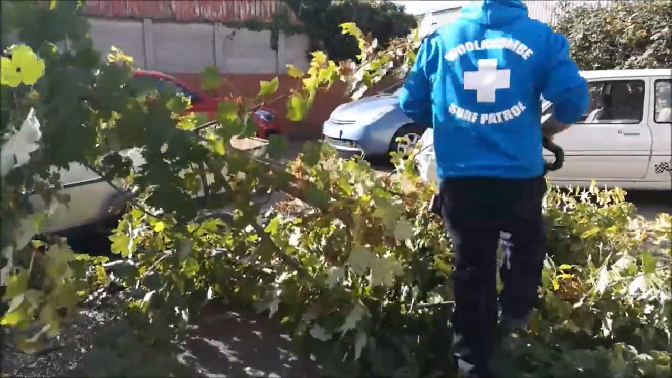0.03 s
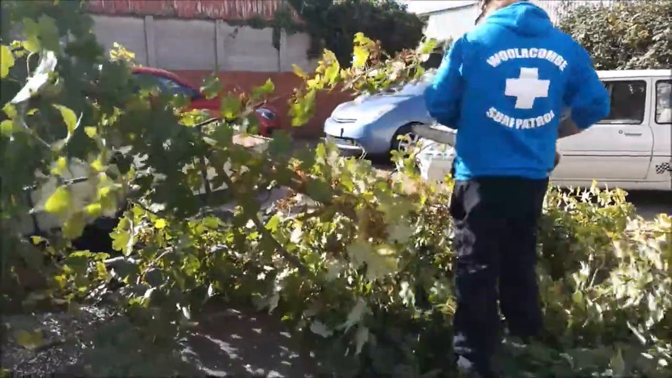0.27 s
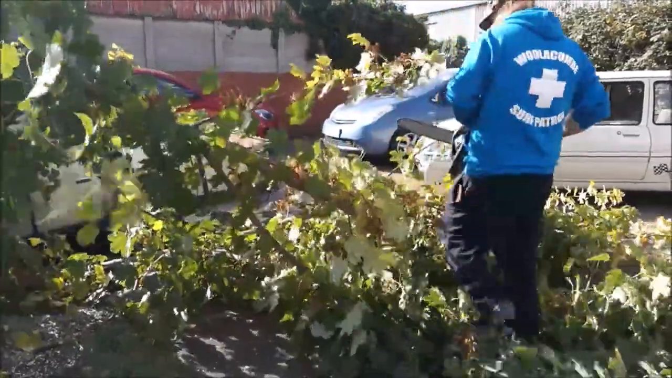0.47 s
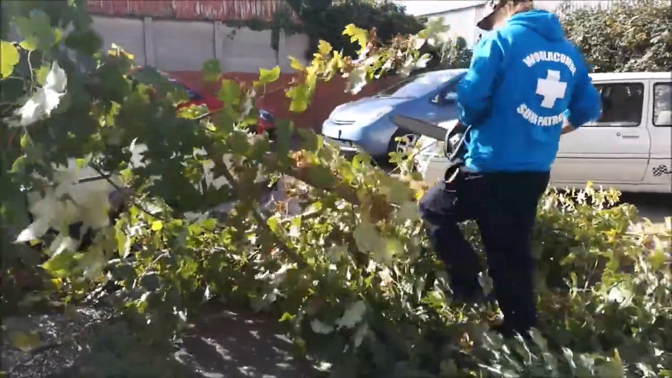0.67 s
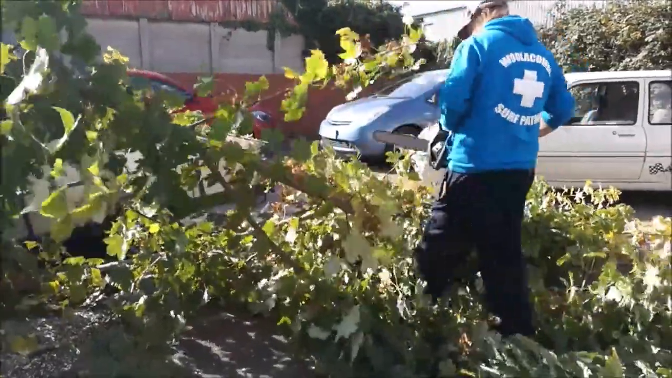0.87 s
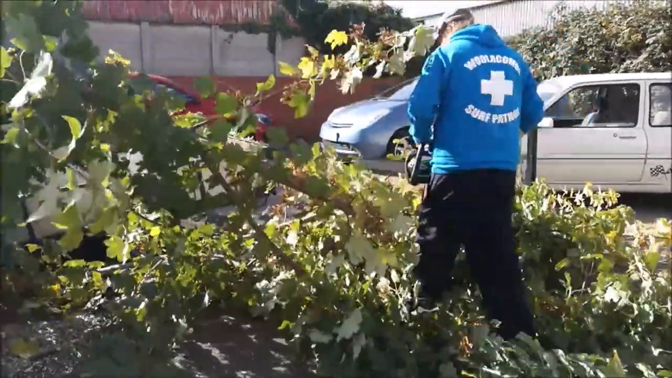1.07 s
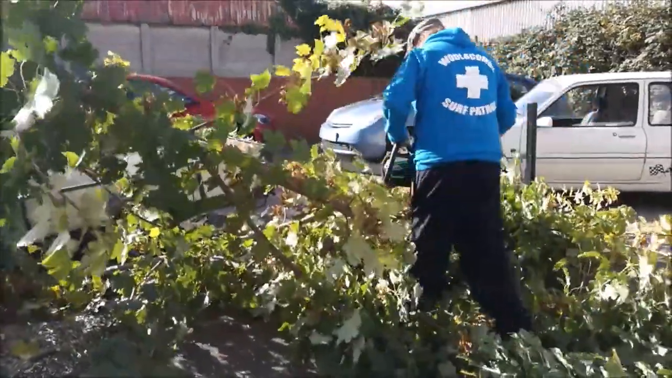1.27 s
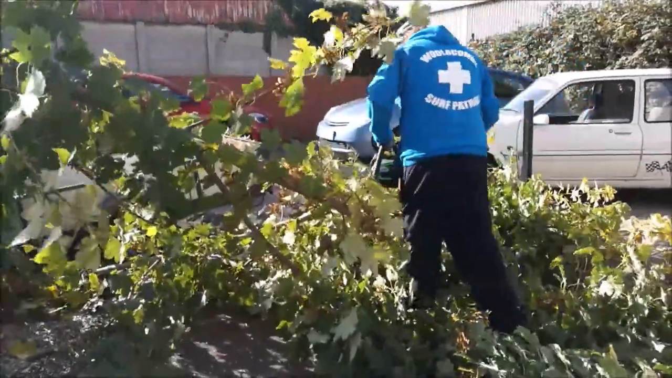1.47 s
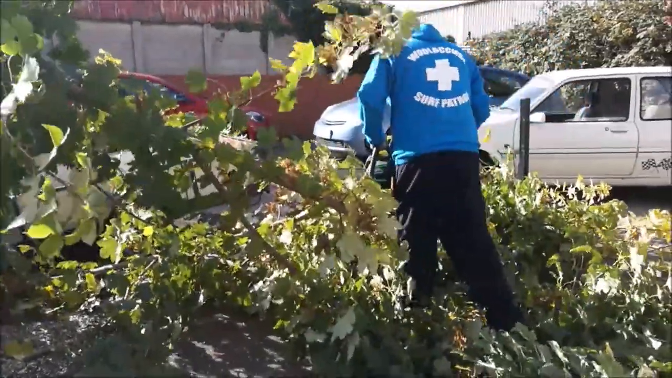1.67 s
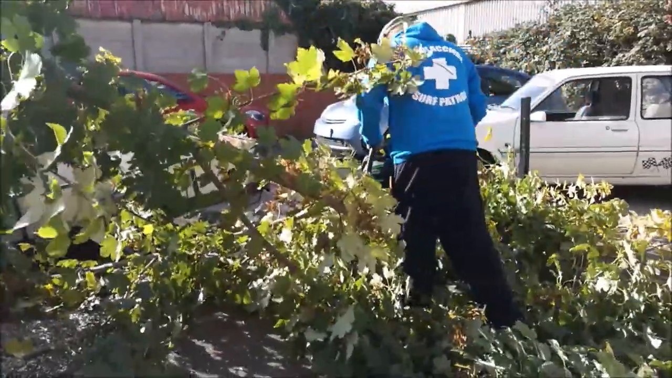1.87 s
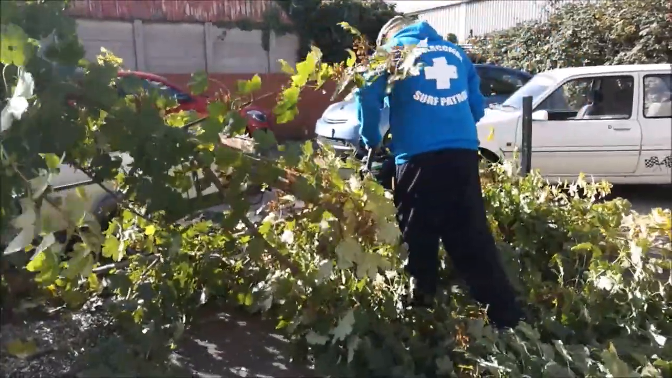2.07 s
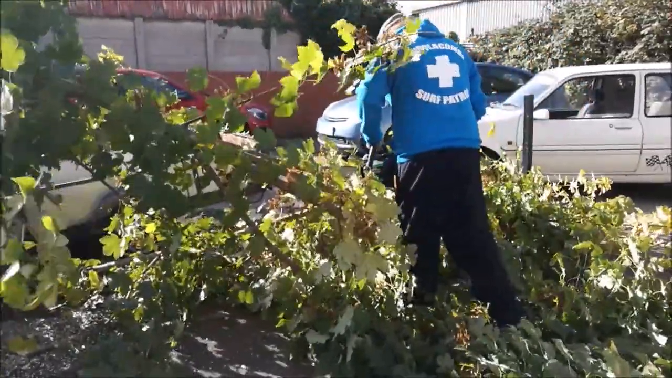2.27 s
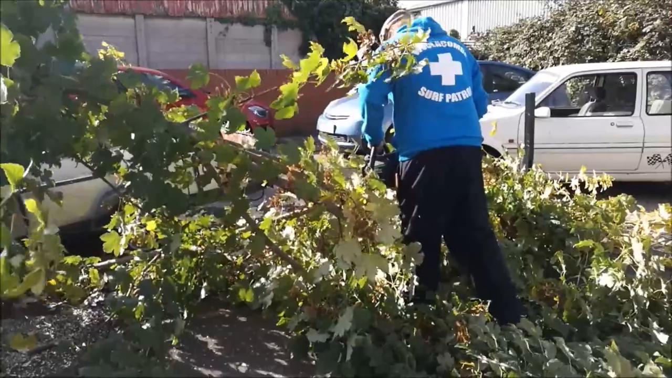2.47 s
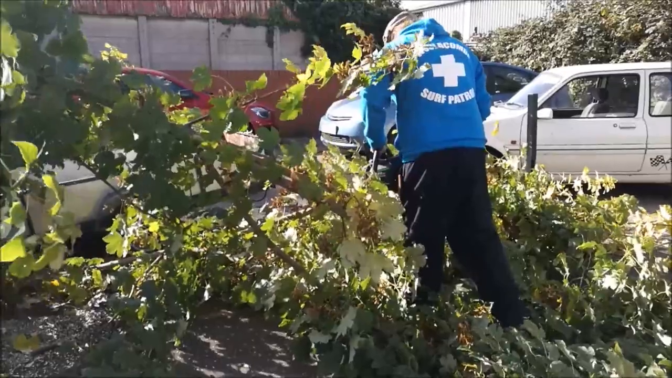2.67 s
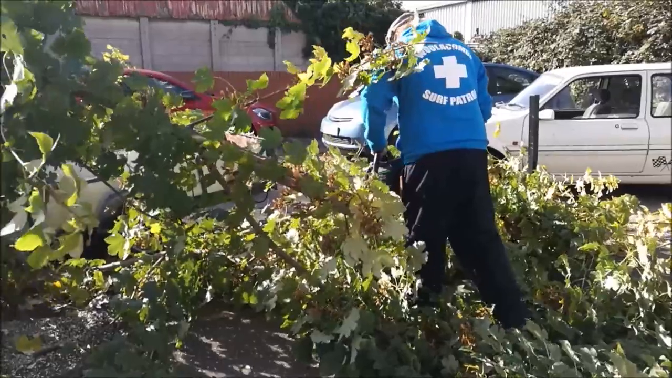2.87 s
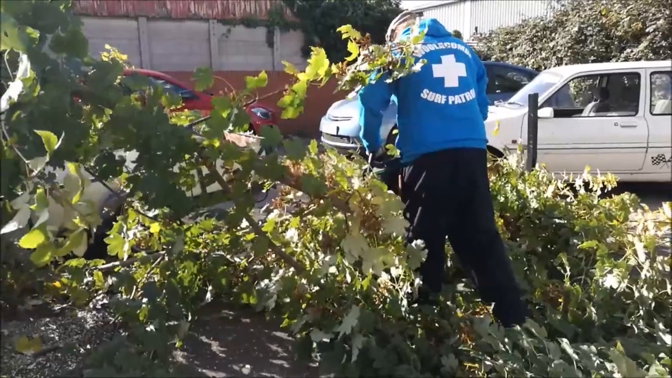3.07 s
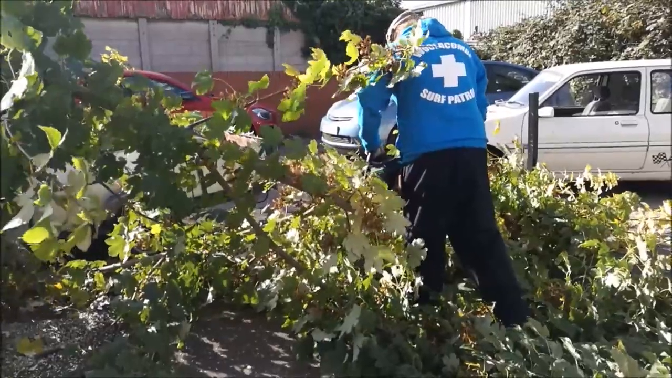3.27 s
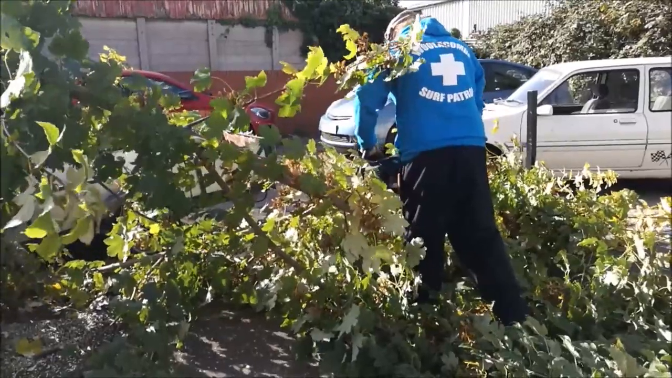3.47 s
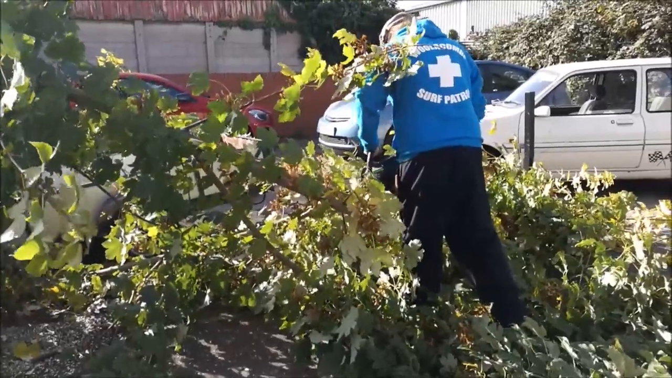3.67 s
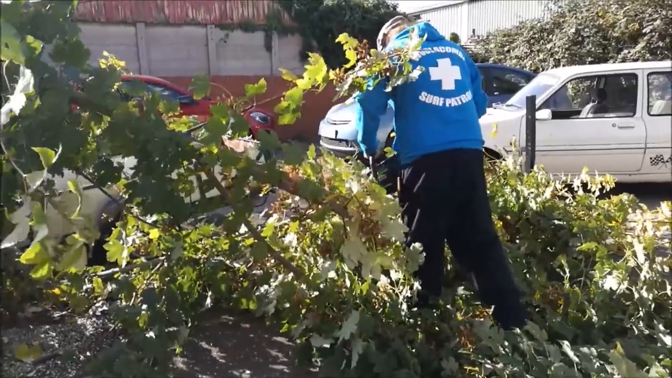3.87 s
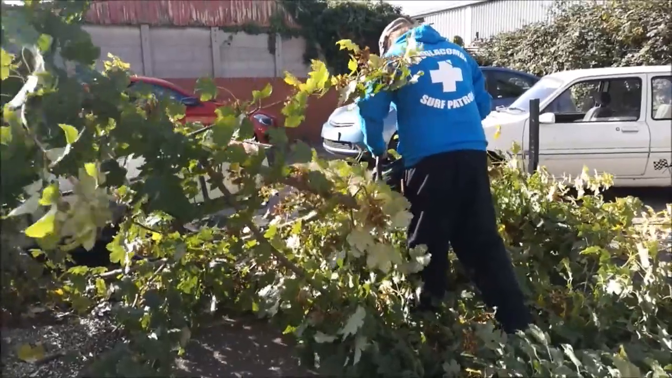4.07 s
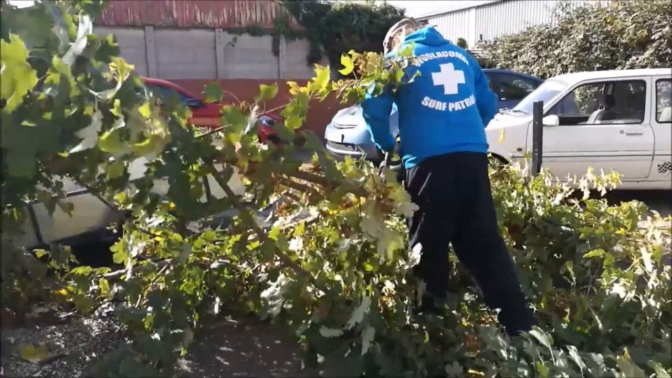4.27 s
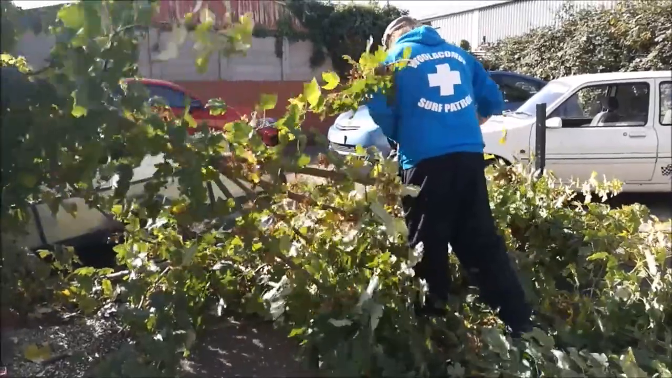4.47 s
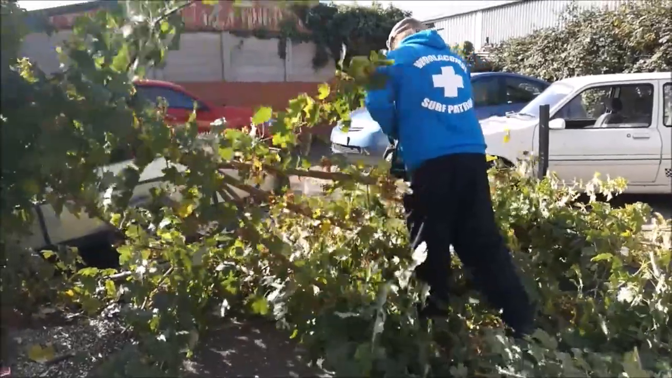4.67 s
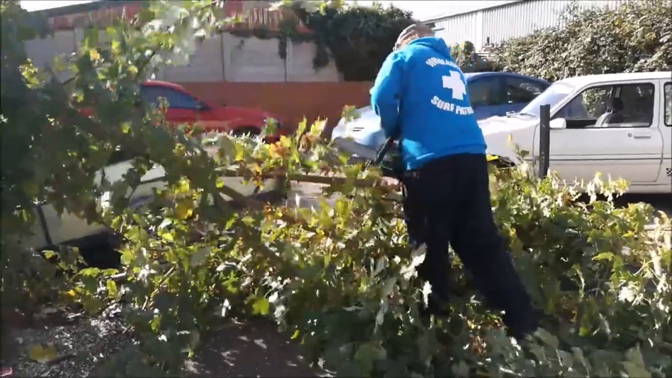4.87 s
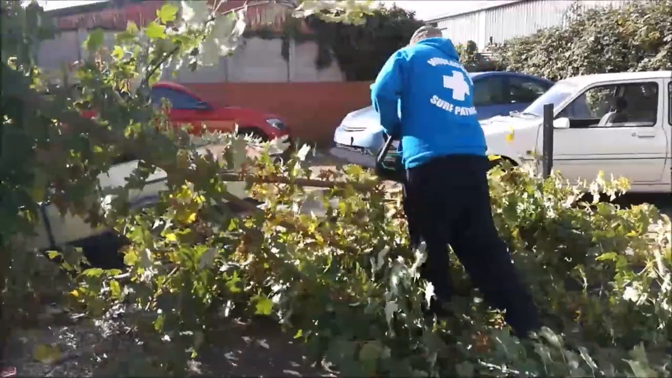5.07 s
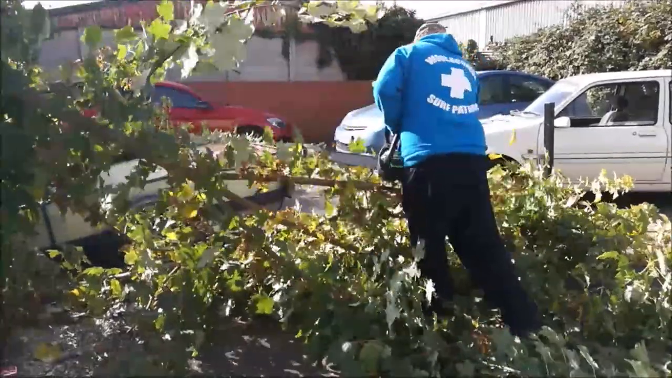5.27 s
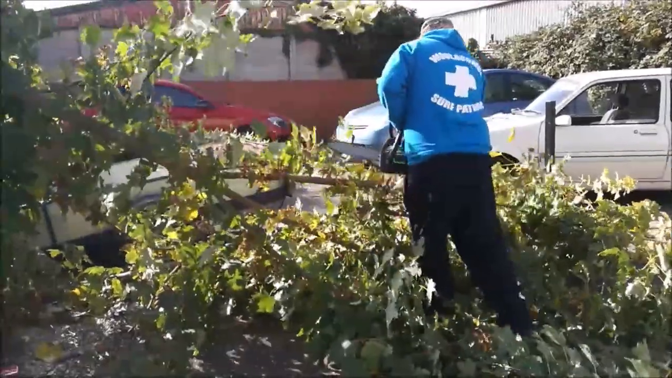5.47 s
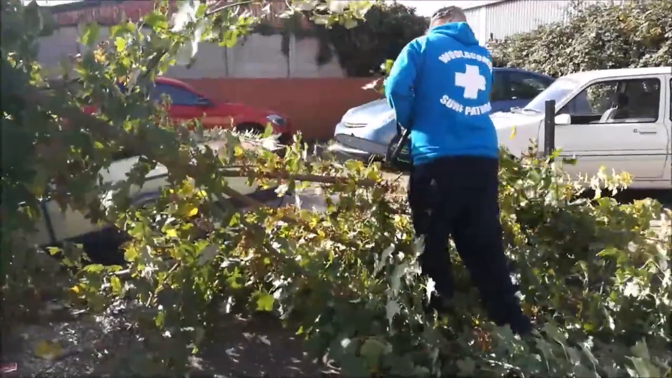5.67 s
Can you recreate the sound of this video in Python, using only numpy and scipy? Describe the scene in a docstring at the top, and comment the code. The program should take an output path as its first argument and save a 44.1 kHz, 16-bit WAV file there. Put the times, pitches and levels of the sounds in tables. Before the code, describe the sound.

In a yard with a low, steady engine hum in the distance, someone steps into leafy branches, cracking twigs. An electric chainsaw climbs to a high whine with a rattling, hissing chain, sagging in pitch as it cuts wood. After under three seconds of running it brakes, squeaking faintly, leaving quieter rustling and small snaps as the branch is pulled away. The saw stands out clearly in the stereo sound.

```python
"""A battery chainsaw in a yard, heard through two small microphone ports. First a step thuds, leaves rustle
and twigs snap as the saw is carried into a fallen tree. The motor winds up: links striking the sprocket
make a rising whine while the chain rattles and hisses. The cutters bite a branch and the load pulls the
pitch down. The brake stops the chain, which squeaks to rest, and the cut bough is dragged away through
the leaves. A distant engine hums throughout."""
import sys
import numpy as np
from scipy import signal
from scipy.fft import rfft, irfft
from scipy.io import wavfile

SR = 44100
rng = np.random.default_rng(int(sys.argv[2]) if len(sys.argv) > 2 else 0)


def inscribe(sig):
    """Save sig as 16-bit PCM at rate SR to the path in sys.argv[1].

    A 1-D sig is mono; a 2-D sig holds one channel per row.
    Samples are clipped to [-1, 1] before scaling.
    """
    pcm = np.round(np.clip(np.atleast_2d(sig).T, -1, 1) * 32767)
    wavfile.write(sys.argv[1], SR, pcm.astype(np.int16))


N = 253134
T = np.arange(N) / SR
HZ = np.fft.rfftfreq(N, 1 / SR)
TEETH, LINKS_PER_PAIR = 6, 4  # links per sprocket turn, and per pair of cutters


# The trigger is squeezed slowly, held, then let go: (time [s], unloaded link rate [1/s])
THROTTLE = [(1.305, 88), (1.75, 282), (2.02, 381), (2.13, 444), (2.39, 560), (2.57, 601), (3.2, 603),
            (3.62, 614), (3.955, 610)]
def saw(jitter=0.0012, engage_s=0.018, brake_s=0.072, full_load_sag=19.5):
    """Rotating machinery: one shaft, set by trigger, load and brake, times the whine, buzz and chain."""
    sag, chips_db = cutting()
    rattle_db, whine_db, ring_db = surges()
    engaged = 1 - np.exp(-since(THROTTLE[0][0]) / engage_s)
    braked = np.exp(-(since(THROTTLE[-1][0]) / brake_s) ** 1.5)
    free_rate = curve(THROTTLE) * engaged * braked
    speed = free_rate / free_rate.max()
    load = np.minimum(sag / full_load_sag, 1)
    shaft_hz = (free_rate - sag * speed) / TEETH * (1 + jitter * wander(13.7))
    turns = np.cumsum(shaft_hz) / SR
    tones = whine(shaft_hz, turns, speed, load, whine_db) + buzz(turns, speed, load)
    return tones + chain(turns, speed, rattle_db, ring_db, chips_db) + high_tones()


# Bites into the wood: (start [s], deepest [s], sag in link rate [1/s], added hiss [dB])
CUTS = [(2.85, 3.451, 42, 6), (3.627, 3.709, 38, 0), (3.848, 3.923, 13.6, 2)]
def cutting(break_free_s=0.1, inertia_s=0.03):
    """Load and inertia: a deepening cut throws more chips and slows the chain with a first-order lag."""
    drag, chips_db = np.zeros(N), np.zeros(N)
    for start, deepest, sag, db in CUTS:
        depth = np.interp(T, [start, deepest, deepest + break_free_s], [0, 1, 0])
        drag += sag * depth ** 2
        chips_db += db * np.sin(np.pi / 2 * depth) ** 2  # levels off once the cutters are full
    keep = np.exp(-1 / (inertia_s * SR))
    return signal.lfilter([1 - keep], [1, -keep], drag), chips_db


# Brief surges: chain slaps during wind-up, then a swell of the whine at full speed:
# (centre [s], length [s], rattle change [dB], whine change [dB], bar ring change [dB])
SURGES = [(1.715, 0.11, 2.5, 2.5, 3.5), (1.898, 0.16, 2.5, 6.5, 5), (2.045, 0.083, 4.5, 3.5, 6),
          (2.846, 0.059, -1, 1.5, -7), (3.118, 0.42, -1.5, 3, -6)]
def surges():
    """Amplitude modulation: rattle, whine and bar ring each change level along a brief bell curve."""
    return sum(np.outer(changes, np.exp(-(2 * (T - s) / length) ** 2)) for s, length, *changes in SURGES)


# Link-rate harmonics and sidebands of the uneven sprocket, then tones of the cutters in the wood:
# (frequency / shaft rate [1], relative level [dB], left minus right [dB])
LINK_ORDERS = [(6, -41.5, 9.5), (7.02, -57, 11), (8.1, -61, 18), (8.94, -60, 13), (10.4, -61, 11),
               (11, -57.5, 23), (11.99, -39, 4.5), (12.99, -47, -11), (13.8, -59.5, 21),
               (17.024, -49.5, -14.5), (18.02, -41.5, -14.5), (19, -51, 19), (20.5, -47, -2),
               (23.5, -60, 17), (24.03, -42.5, 12.5), (25.8, -54, 20), (31.1, -43.5, 6)]
CUTTER_ORDERS = [(20.94, -37, -5), (24.1, -48, 13), (25.5, -39, 5.5), (35.9, -40, 2), (41.9, -51, 4)]
def whine(shaft_hz, turns, speed, load, surge_db, loaded_db=-3.5):
    """Periodic impacts give a line spectrum: sidebands grow with speed, cutter tones with load."""
    flutter = 0.12 + 0.49 * (1 - speed)  # a slow chain hangs loose and strikes unevenly
    links = np.zeros((2, N))
    for row in LINK_ORDERS:
        is_sideband = round(row[0]) % TEETH != 0
        whip = speed ** 0.8 if is_sideband else 1
        damping = amp(loaded_db * load * TEETH / row[0])  # load damps the lowest tones most
        links += partial(row, shaft_hz, turns, flutter) * damping * whip
    cutters = sum(partial(row, shaft_hz, turns, flutter) for row in CUTTER_ORDERS)
    taut, loose = amp(-0.5) * speed ** 5.2, amp(-9) * speed ** 2  # tones ring out only near full speed
    return np.hypot(taut, loose) * (links * amp(surge_db) + cutters * load)


# Modes of the housing: (frequency [Hz], bandwidth [Hz], gain [dB])
HOUSING_MODES = [(671, 190, 0), (1147, 61, 0), (1697, 142, 8.5)]
def partial(row, shaft_hz, turns, flutter, port_delay_s=0.0002, drift_db=0.82):
    """Forced resonance: a shaft order swells as it sweeps through a mode of the housing."""
    order, db, side_db = row
    hz = order * shaft_hz
    body = 1 + peaks(HOUSING_MODES, hz)
    body /= 1 + np.exp((420 - hz) / 40)  # the small shell radiates little bass
    unrest = np.sqrt(order / TEETH)  # chain slap roughens the higher orders most
    shake = flutter * unrest
    level = np.sqrt(2) * amp(db + drift_db * unrest * wander(5.6)) * body * (1 + shake * wander(26))
    phase = 2 * np.pi * order * turns + 0.45 * shake * wander(37.2)
    return level * pan(side_db) * np.cos([phase, phase - 2 * np.pi * hz * port_delay_s])


def buzz(turns, speed, load, centre_hz=3400, width_octaves=2.2, bite_db=4):
    """Harmonic series of the passing cutter pairs: a dense, uneven comb that swells in the cut."""
    pair_turns, pair_hz = turns * TEETH / LINKS_PER_PAIR, THROTTLE[-1][1] / LINKS_PER_PAIR
    out = np.zeros((2, N))
    for k in range(14, 62):
        db = 3 * rng.standard_normal((2, 1)) - 10 * (np.log2(k * pair_hz / centre_hz) / width_octaves) ** 2
        phase = 2 * np.pi * (k * pair_turns + rng.random((2, 1)))
        out += amp(db) * pan(spectrum(PORT_BALANCE, k * pair_hz)) * np.cos(phase)
    return np.sqrt(2) * out * speed ** 2.7 * amp(-59 + bite_db * load)


# Chain rattle, and hiss of teeth and chips: (frequency [Hz], relative spectral density [dB])
RATTLE_SPECTRUM = [(90, -45), (220, -12.5), (400, -17), (550, -10.5), (800, -6.5), (1100, 3.5), (1450, -2),
                   (1700, 5.5), (2200, 0), (2800, -1.5), (4000, -4.5), (7000, -24), (16000, -6)]
HISS_SPECTRUM = [(150, -45), (500, -42), (2000, -2), (3900, 2), (5000, -1), (7000, -2), (8500, -3),
                 (10000, -1), (11000, 0), (12500, -5), (16000, -13)]
# Modes of the guide bar: (frequency [Hz], bandwidth [Hz], gain [dB])
BAR_MODES = [(767, 300, -7), (1210, 160, -3.5), (1643, 114, -2.5), (2824, 154, -1)]
# Added port bias of rattle and bar: (frequency [Hz], left minus right [dB])
SAW_BALANCE = [(350, -9), (600, 19.5), (850, 13.5), (1200, -0.5)]
# Reflections of the hiss from ground and trunk: (delay [s], gain [1])
REFLECTIONS = [(.0031, 0.31), (.0074, .27)]
def chain(turns, speed, rattle_db, ring_db, chips_db, sink_s=2.02):
    """Random impacts give noise: the bar rings, while rattle and hiss pulse with links and cutters."""
    link_phase = 2 * np.pi * TEETH * turns
    pulse = (1 + 0.074 * np.cos(link_phase)) * (1 + 0.07 * np.cos(link_phase / LINKS_PER_PAIR))
    side_db = spectrum(SAW_BALANCE)
    comb = 1 + sum(gain * np.exp(-2j * np.pi * HZ * delay) for delay, gain in REFLECTIONS)
    knocks = crackle(900, 2.3, 0.0027, 1.9) * pulse * amp(0.44 * wander(26.9))
    rattle = ports(knocks, amp(spectrum(RATTLE_SPECTRUM)), side_db)
    chips = crackle(1500, 2.0, 0.0018, 5.9) * pulse * amp(0.46 * wander(21.85))
    hiss = ports(chips, amp(spectrum(HISS_SPECTRUM)) * comb)
    ring = ports(crackle(180, 1.4, 0.0058, 0.9), peaks(BAR_MODES), side_db)
    sunk_s = since(sink_s)  # all three fade as the bar sinks in among the branches
    rattle *= amp(-32 - 0.4 * sunk_s + rattle_db) * speed ** 1.4
    hiss *= amp(-28.5 - 2.06 * sunk_s + chips_db) * speed ** 1.79
    driven = amp(-39 - 5 * sunk_s + ring_db) * speed
    braked_s = since(THROTTLE[-1][0])
    free_decay = amp(-51.5 - 46 * braked_s) * (braked_s > 0)  # the bar rings on after the brake catches
    return rattle + hiss + ring * np.hypot(driven, free_decay)


# Brief high tones: overtones of the whine ringing out in the cuts, and chain squeaks:
# (centre [s], length [s], frequency [Hz], level [dB])
HIGH_TONES = [(2.61, 0.12, 5550, -41), (3.388, 0.07, 3480, -39), (3.9, .07, 2320, -31),
              (4.007, 0.14, 7450, -58), (4.083, 0.13, 2830, -60), (4.268, 0.19, 2770, -61),
              (4.5, 0.11, 2640, -61)]
def high_tones(waver_hz=45, fall_per_s=0.156):
    """Random modulation of pitch and level roughens brief tones, each sinking a little in pitch."""
    waver = np.cumsum(waver_hz * wander(244.6)) / SR
    roughness = unit_rms(1 + 0.52 * wander(60))
    out = np.zeros(N)
    for s, length, hz, db in HIGH_TONES:
        swell = amp(db) * np.exp(-(2 * (T - s) / length) ** 4)
        cycles = hz * (T - fall_per_s * (T - s) ** 2 / 2) + waver
        out += swell * roughness * np.sin(2 * np.pi * cycles)
    return out


# Leaf noise: (frequency [Hz], relative spectral density [dB])
LEAF_SPECTRUM = [(200, 0), (700, -1), (1500, 0), (2800, 5), (4000, 4), (6000, 0), (8000, -2.5), (10000, 1),
                 (11000, 2), (12500, -3.5), (16000, -8)]
# Branches brushed on the way in, later dragged away: (time [s], hold [s], relative level [dB])
RUSTLES = [(0.044, 1.17, -61.5), (0.128, 0.078, -44.5), (0.224, 0.18, -46.5), (0.733, 0.093, -55.5),
           (0.965, .01, -54.5), (1.072, 0.062, -55), (4.082, 1.246, -56), (4.418, .015, -54),
           (4.6, 0.27, -55), (5.0, .03, -57), (5.23, .01, -53), (5.452, .11, -52.5), (5.638, 0.076, -50)]
def leaves(rise_s=0.03, gain_db=2):
    """Incoherent sources add in power: each push sets leaves brushing in clumps of tiny ticks."""
    power = np.zeros(N)
    for s, hold, db in RUSTLES:
        fall_s = 0.016 + 0.46 * min(hold, 0.25)  # a longer push leaves them swinging longer
        swell = np.exp(-np.maximum(s - T, 0) / rise_s - since(s + hold) / fall_s)
        power += (amp(db + gain_db) * swell) ** 2
    return np.sqrt(power) * ports(crackle(450, 2.0, 0.0058, 1.0), amp(spectrum(LEAF_SPECTRUM)))


# Snapping twigs: (time [s], relative level [dB], 60 dB decay time [s], wood relative to crack [dB])
SNAPS = [(0.679, -36, 0.047, -22), (.716, -44.5, 0.13, -1), (0.8, -33, 0.046, -16), (0.962, -40, .1, -20),
         (1.071, -34, 0.059, -24), (1.146, -36, 0.08, -24), (1.321, -41, 0.065, -0.5),
         (1.66, -28, 0.094, -20), (1.747, -17, 0.07, -27), (4.411, -39, 0.17, -2), (4.698, -44, .08, -0.5),
         (4.889, -37, 0.054, -12), (5.23, -40, 0.045, -13), (5.634, -46.5, .15, 6.5)]
# Modes of a twig: (frequency [Hz], bandwidth [Hz], gain [dB])
TWIG_MODES = [(1640, 800, -3), (2800, 990, 12)]
def twigs(rise_s=0.0012, crisp_hz=3500, gain_db=-7):
    """Impulsive excitation: a fracture gives a bright crack and a woody ring, decaying exponentially."""
    crisp = amp(spectrum(LEAF_SPECTRUM)) * HZ / (HZ + crisp_hz)
    crack = ports(crackle(1200, 0.98, 0.00055, 0.73), crisp)
    wood = ports(noise(), peaks(TWIG_MODES))
    out = np.zeros((2, N))
    for s, db, t60, wood_db in SNAPS:
        envelope = amp(db + gain_db - 60 * since(s) / t60) * (1 - np.exp(-since(s) / rise_s))
        out += envelope * (crack + amp(wood_db) * wood)
    return out


def footstep(at_s=0.096, db=-51, t60_s=1, hz=286, width_hz=260):
    """Damped impact: a heavy step on soil gives a dull puff of low noise."""
    puff = ports(noise(), peaks([(hz, width_hz, 0)]) ** 2)
    return puff * amp(db - 60 * since(at_s) / t60_s) * (T >= at_s)


# Distant engine: (time [s], firing rate [Hz], gain [dB], overtone gain [dB])
HUM = [(0, 78.1, 0, -18), (.55, 79.15, 1, 4), (1.2, 78.84, 2.5, -2.5), (2.4, 78.64, 0, 7),
       (3.3, 77.5, -3.5, 9), (4.5, 77.32, -0.5, 2), (5.74, 77.6, -1, 9.5)]
# A lower drone that creeps up and beats against the hum: (time [s], fundamental [Hz], gain [dB])
DRONE = [(0, 29.2, -19), (.6, 29.14, -1), (2.0, 31.94, 11), (3.0, 35, 9), (5.0, 38.4, 8.5),
         (5.74, 37.37, 11)]
# Their harmonics: (harmonic number [1], base level [dB])
HUM_HARMONICS = [(1, -71), (2, -51), (3, -60), (4, -69.5), (5, -73.5), (6, -72), (7, -78.5), (8, -74),
                 (9, -64.5), (10, -72), (11, -71.5), (13, -76)]
DRONE_HARMONICS = [(1, -70), (2, -67), (4, -69), (6, -76)]
def engine(track, harmonics, overtones_db=0, waver=0.00301, side_db=-5, right_delay_s=0.0004):
    """Periodic firing gives harmonics that fade in the air; higher ones favour the right port."""
    hz = curve(track)
    turns = np.cumsum(hz * (1 + waver * wander(3.08))) / SR
    lag = np.array([[0], [right_delay_s]]) * hz
    out = np.zeros((2, N))
    for k, db in harmonics:
        shaded = np.clip((k * hz - 200) / 250, 0, 1)  # bass diffracts round obstacles, overtones do not
        level = amp(db + shaded * overtones_db + wander(4.0)) * pan(shaded * side_db)
        out += level * np.cos(2 * np.pi * (k * (turns - lag) + rng.random()))
    return np.sqrt(2) * amp(curve(track, column=2)) * out


# Air of the yard: (frequency [Hz], relative spectral density [dB])
YARD_SPECTRUM = [(15, -26), (35, 3), (55, 2), (75, -14), (100, -1.5), (150, 0.5), (250, 0.5), (400, -11.5),
                 (750, -6.5), (1200, -22), (3000, -22.5), (7000, -31), (10500, -28.5), (16000, -36)]
def yard_air(db=-55.5):
    """Ambient noise: a low, broad rush whose level wavers slightly."""
    return amp(db + 1.5 * wander(12)) * ports(noise(), amp(spectrum(YARD_SPECTRUM)))


# The two ports: (frequency [Hz], left minus right [dB]) and (frequency [Hz], correlation [1])
PORT_BALANCE = [(200, 1), (450, -0.5), (800, -5), (1300, -5.5), (1650, -2.5), (1950, 0.5), (2600, 1),
                (4400, 5), (7000, 8), (10500, 15.5), (12500, 7.5), (15000, -0.5)]
PORT_CORRELATION = [(60, 0.77), (150, 1), (300, 0.67), (650, -0.63), (1400, 0.3), (3100, -0.049),
                    (7000, 0.016)]
def ports(x, gain, side_db=0):
    """Partial coherence: two independent noises are filtered and shared; the ports' mean has rms 1."""
    left, other = rfft(x)
    shared = spectrum(PORT_CORRELATION)
    right = shared * left + np.sqrt(1 - shared ** 2) * other
    pair = irfft(np.array([left, right]) * gain * pan(spectrum(PORT_BALANCE) + side_db), N)
    return pair / np.std(pair.mean(0))


def crackle(per_s, spread_db, ring_s, bed):
    """Shot noise: tiny bursts of uneven size over a bed of merged ones."""
    size = amp(spread_db * np.minimum(rng.exponential(1, N), 4)) * (rng.random(N) < per_s / SR)
    power = signal.lfilter([1], [1, -np.exp(-2 / (ring_s * SR))], size ** 2)
    return noise() * np.sqrt(power / power.mean() + bed)


def noise():
    """Independent white noise for two ports."""
    return rng.standard_normal((2, N))


def wander(cutoff_hz):
    """Low-passed random fluctuation of rms 1."""
    t = np.linspace(0, T[-1], num=4096)
    hz = np.fft.rfftfreq(len(t), t[1])
    slow = irfft(rfft(rng.standard_normal(len(t))) / (1 + (hz / cutoff_hz) ** 4))
    return np.interp(T, t, unit_rms(slow))


def peaks(modes, hz=HZ):
    """Summed gain of Lorentzian resonances."""
    return sum(amp(db) / (1 + (2 * (hz - f) / width) ** 2) for f, width, db in modes)


def spectrum(points, hz=HZ):
    """A table interpolated on a log-frequency axis."""
    f, value = np.transpose(points)
    return np.interp(np.log(hz + 1), np.log(f), value)


def curve(rows, column=1):
    """One column of a timed table at every sample."""
    rows = np.array(rows)
    return np.interp(T, rows[:, 0], rows[:, column])


def since(s):
    """Seconds elapsed since a moment, 0 before it."""
    return np.maximum(T - s, 0)


def pan(db):
    """Left and right gains for a level difference."""
    return amp(np.array([db, -db]).reshape(2, -1) / 2)


def amp(db):
    return 10 ** (np.asarray(db) / 20)


def unit_rms(x):
    return x / np.sqrt(np.mean(x ** 2) + 1e-20)


def scene():
    """Superposition: saw, foliage and step add to the distant engine and the air of the yard."""
    air = yard_air()
    hum = engine(HUM, HUM_HARMONICS, curve(HUM, column=3)) + engine(DRONE, DRONE_HARMONICS)
    return saw() + leaves() + twigs() + footstep() + hum + air


def record(dry, cutoff_hz=15900):
    """Band limiting: a linear-phase low-pass removes the highest treble."""
    lowpass = signal.firwin(701, cutoff_hz, window=("kaiser", 9), fs=SR)
    return signal.oaconvolve(dry, lowpass[None], "same")


dry = scene()
out = record(dry)
inscribe(out)
```